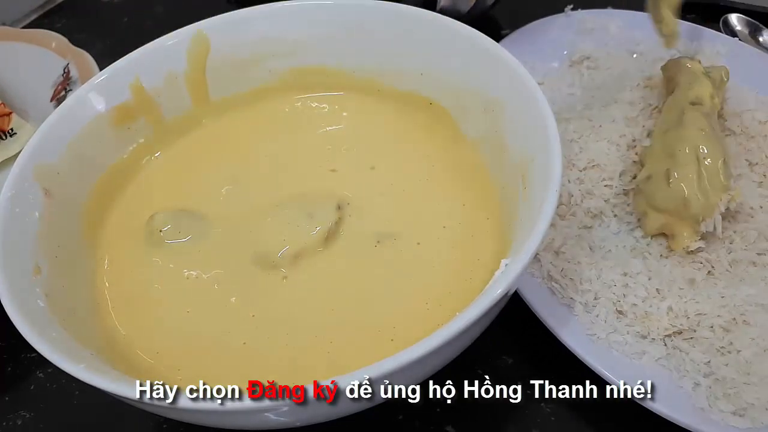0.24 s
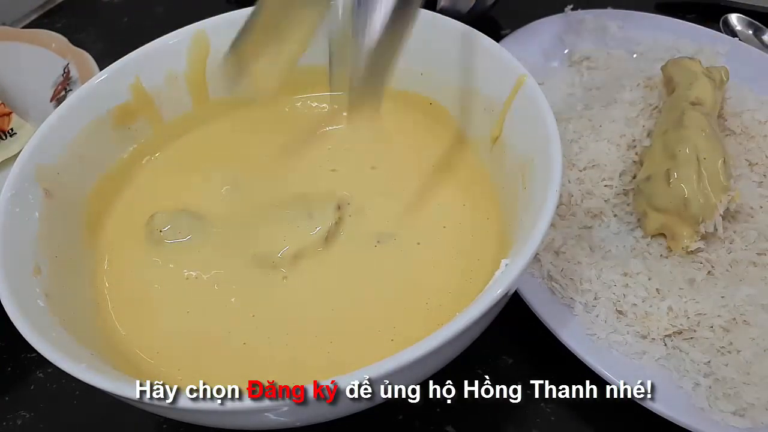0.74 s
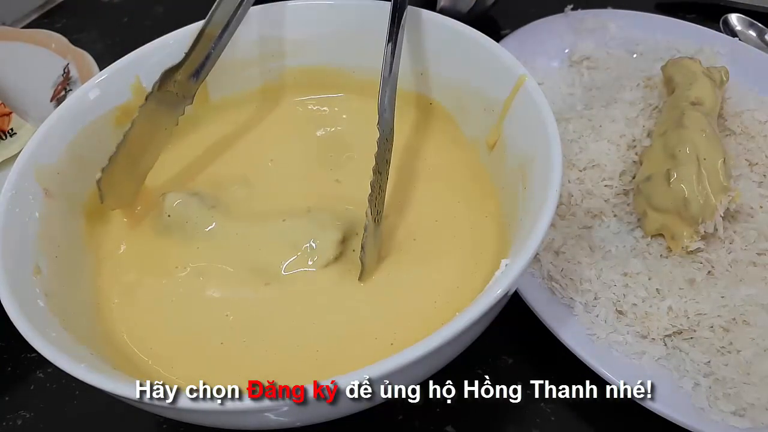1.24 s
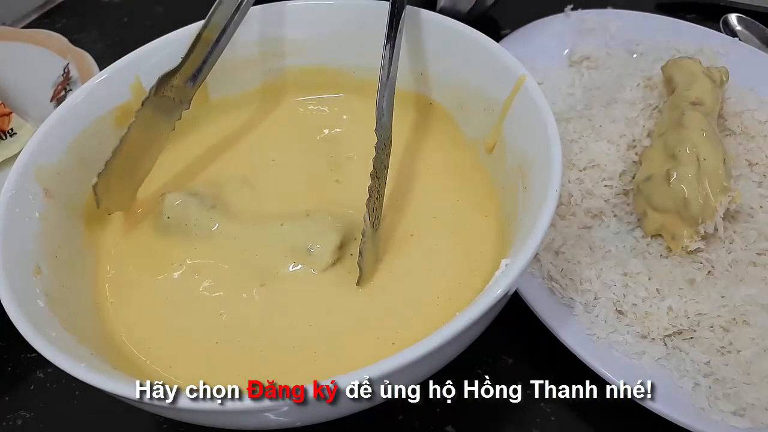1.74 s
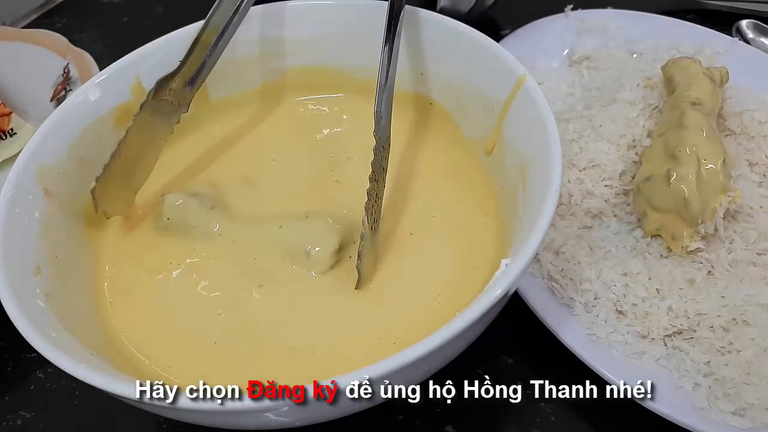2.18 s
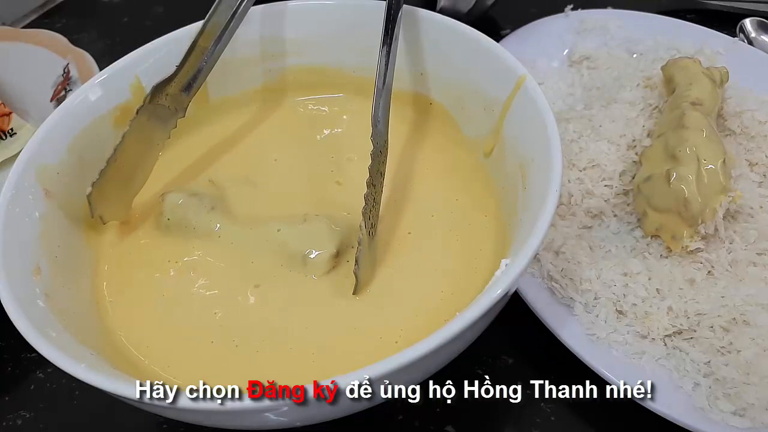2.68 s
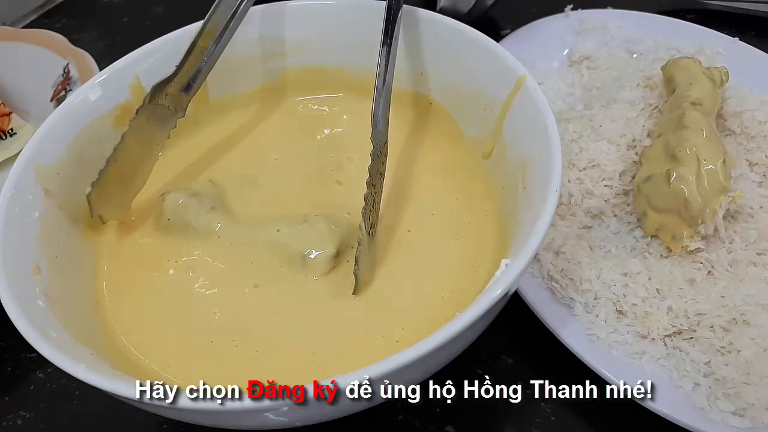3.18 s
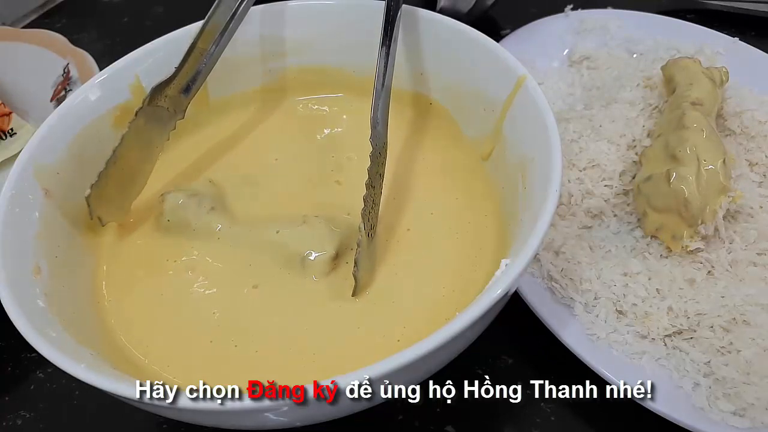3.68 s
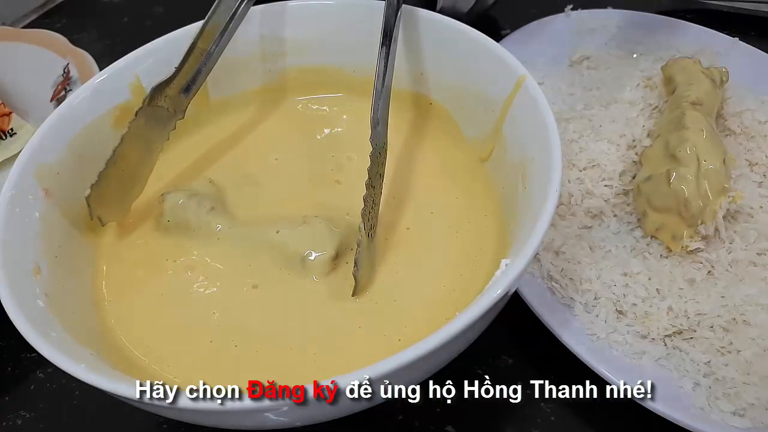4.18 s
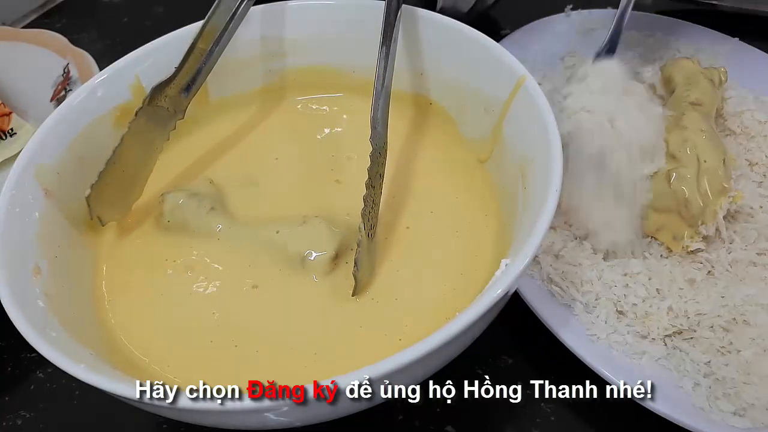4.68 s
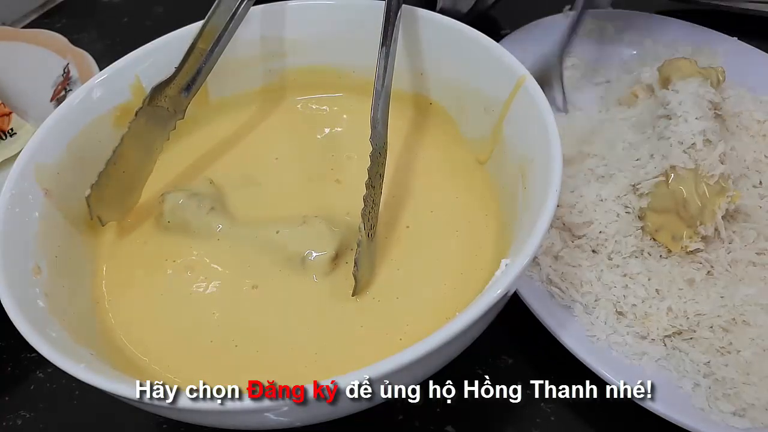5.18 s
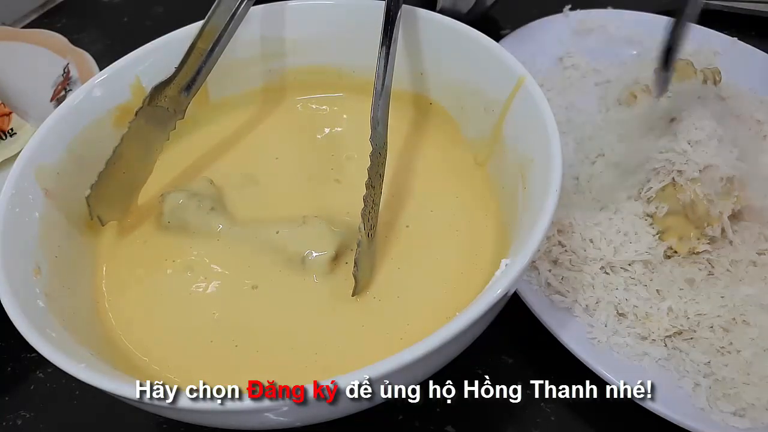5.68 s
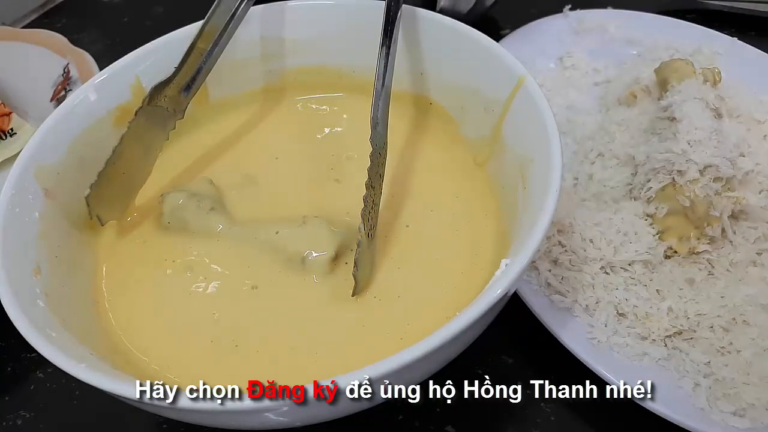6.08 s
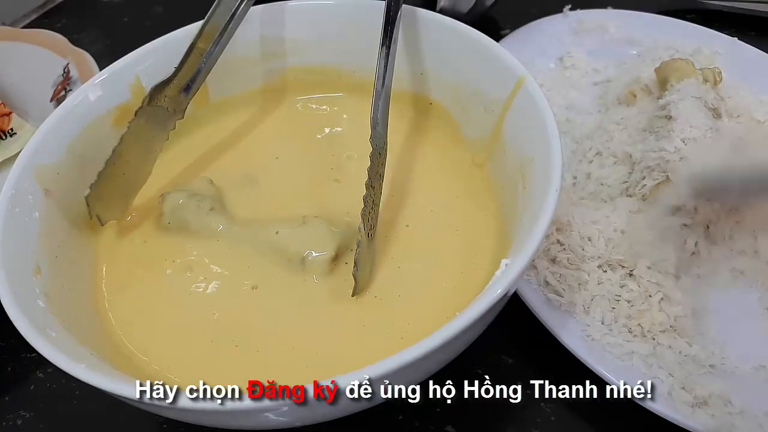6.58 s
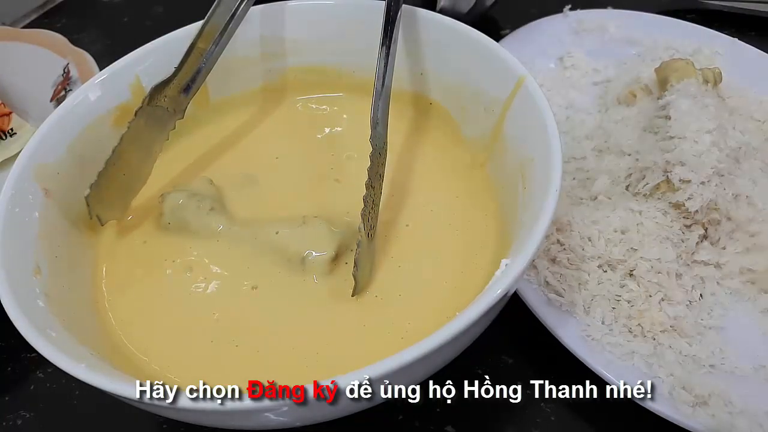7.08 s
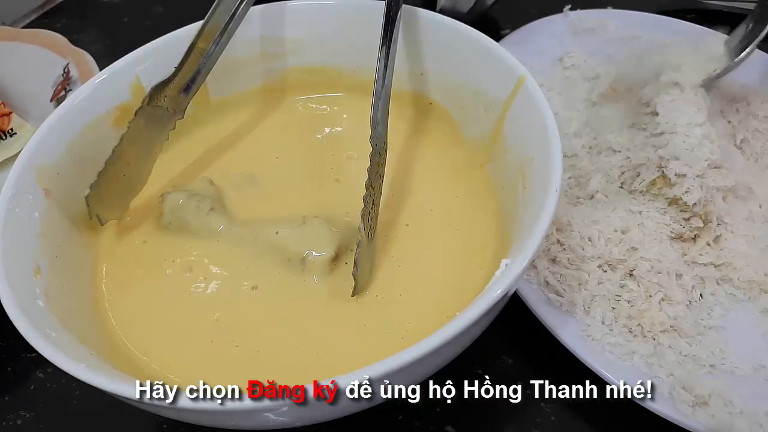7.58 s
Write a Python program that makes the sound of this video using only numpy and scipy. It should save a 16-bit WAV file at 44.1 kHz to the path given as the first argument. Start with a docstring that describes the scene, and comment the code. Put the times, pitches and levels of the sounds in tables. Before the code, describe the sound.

A close stereo kitchen scene sits over a low wavering appliance hum and soft steady air noise, with short reflections from hard walls. At first dry crumbs rustle faintly with tiny crisp snaps, mainly at 0.4 to 0.5 and 0.9 seconds. At about 1.1 and 1.25 seconds tongs strike a ceramic bowl, giving strong hollow clunks with short rings; lighter, drier knocks come at 2.1 and 2.3. From 3.0 to 3.3 a spoon scrapes the plate in loud gritty jerks, with bright steel ringing and clustered clatter. A brief rough squeak of the sliding plate follows around 3.55, a knock at 3.8 and a sharp, hard tap at 4.4. Between 4.8 and 6.6 crumbly strokes come and go with crackling snaps and weak taps. A last dull, short knock lands at 7.0, then sparse quiet rustling, and a soft stroke from 7.65 is still sounding at the end, near 7.8.

```python
"""A kitchen counter, heard close up in stereo, with a low appliance hum and steady air noise throughout.
First dry crumbs rustle and snap as a spoon pushes them about; at 1.1 s tongs start to knock a ceramic bowl.
From about 3 s the spoon scrapes a plate in jerks and rings; at 3.5 s the sliding plate squeaks.
Then come more strokes and scattered knocks, the last at 7 s; a last soft stroke is still sounding at the end.
Shaped noise makes the rough sounds, dying sines the thuds and rings; hard walls answer, loud peaks flatten."""
import sys
import numpy as np
from scipy import signal
from scipy.fft import rfft, irfft, next_fast_len
from scipy.io import wavfile
from scipy.ndimage import map_coordinates

SR = 44100
rng = np.random.default_rng(int(sys.argv[2]) if len(sys.argv) > 2 else 0)


def unload_audio(sound):
    """Save the sound as a 16-bit wav file, at the path given as the first command line argument."""
    columns = np.transpose(np.atleast_2d(sound))
    # keep every value between -1 and 1, then stretch to whole-number steps
    steps = np.round(np.clip(columns, -1, 1) * 32767)
    wavfile.write(sys.argv[1], SR, steps.astype(np.int16))


N = 345744
TOP_HZ = 15983  # nothing above this is kept

# Knocks on dishes: tongs on the bowl, the spoon's jerks as it scrapes, taps on the plate; columns:
# t/s, level/dB, dull thud f/Hz, hard thud f/Hz, hard thud level/dB, share of the full ring time
KNOCKS = [(1.076, 1.5, 907, 1057, -7.5, 0.48), (1.089, -6.5, 857, 1150, -30, 0.82),
          (1.241, 3, 885, 1117, -11, 0.75), (1.253, 2, 935, 1676, -8, 0.68),
          (2.105, -12, 814, 1410, -3, 0.36), (2.126, -3, 790, 1500, -7.5, 0.34),
          (2.321, -1.5, 810, 1490, -3, 0.39), (3.002, -10, 570, 1490, 4, 0.28),
          (3.008, -13.5, 595, 2300, 6.5, 0.29), (3.014, -7.5, 614, 1700, -0.5, 0.23),
          (3.03, -6.5, 1500, 2900, -10, 0.22), (3.058, -7.5, 510, 2520, 8.5, 0.18),
          (3.094, -9.5, 1860, 3520, -2, 0.17), (3.127, -15, 2410, 3970, -6, 0.15),
          (3.201, -1.5, 2600, 4200, -6, 0.22), (3.217, -2.5, 496, 2310, 0, 0.23),
          (3.774, -2.5, 760, 1500, -13, 0.32), (3.782, -5.5, 820, 1520, 0, 0.46),
          (4.4157, 1, 2190, 4010, -3.5, 0.18), (4.417, -10.5, 1013, 2550, -7, 0.48),
          (4.512, -19, 970, 2400, 0, 0.27), (4.574, -19, 397, 740, -6.5, 0.6),
          (5.148, -13.5, 700, 1500, -6.5, 0.41), (5.157, -18, 1110, 1130, -26, 0.81),
          (5.282, -13, 940, 1450, -2.5, 0.23), (6.371, -19.5, 774, 1730, -9.5, 0.61),
          (7.024, -15.5, 414, 3000, -2.5, 0.28), (7.035, -5.5, 780, 1630, -8, 0.14)]
# Tone colour of moving crumbs; columns: f/Hz, level/dB (per Hz)
CRUMB_COLOUR = [(1500, -43), (3500, 3), (5000, 3.5), (8000, 4.5), (12000, 1.5), (16000, -1.5)]


def amp(db):
    """Turn decibels into a factor on the waveform."""
    return 10 ** (np.asarray(db) / 20)


def unit(x):
    """Scale a sound to an average (rms) strength of 1."""
    return x / np.sqrt(np.mean(x ** 2) + 1e-20)


def along(points, hz):
    """Read a curve of (f/Hz, value) points, joined by straight lines on a log frequency axis."""
    f, values = np.transpose(points)
    return np.interp(np.log(hz + 1), np.log(f + 1), values)


def curves(rows, outside=None):
    """Draw one curve over time for each column after the time; outside is its value beyond the ends."""
    s, *columns = np.transpose(rows)
    t = np.arange(N) / SR
    return [np.interp(t, s, column, outside, outside) for column in columns]


def wobble(rate):
    """Draw a smooth random curve through rate random points a second."""
    points = rng.standard_normal(int(N * rate / SR) + 4)
    return map_coordinates(points, [np.arange(N) * rate / SR])


def filtered(x, response):
    """Change the strength and phase of each frequency in x by a response."""
    n = x.shape[-1]
    padded = next_fast_len(n + 8192)  # room for ringing after the end
    spectrum = rfft(x, padded) * response(np.fft.rfftfreq(padded, 1 / SR))
    return irfft(spectrum, padded)[..., :n]


def resonant(peaks):
    """Make the response of a body with resonances (f/Hz, width/Hz, level/dB), added with alternate signs."""
    def response(f):
        total = 0
        for k, (centre, width, db) in enumerate(peaks):
            peak = 1j * f * width / (centre * centre - f * f + 1j * f * width)
            total = total + (-1) ** k * amp(db) * peak
        return total
    return response


def paired(pair):
    """Mix two unrelated signals so that left and right are alike in the bass and differ in the treble."""
    # How alike the two microphones hear; columns: f/Hz, likeness (1 = the same)
    likeness = [(30, 0.99), (150, 0.74), (500, 0.9), (2000, 0.094), (12000, 0.043)]

    def mid_side(hz):
        turn = np.arccos(np.clip(along(likeness, hz), -1, 1)) / 2
        return np.array([np.cos(turn), np.sin(turn)])

    mid, side = filtered(pair, mid_side)
    return np.array([mid + side, mid - side])


def grit(spiky_db, clump_db, clumps):
    """Make rough noise from many small fractures and a few big ones, in random clumps (points a second)."""
    size = np.minimum(rng.exponential(size=N // 32 + 1), 4.5)
    burst = np.repeat(size, 32)[:N]  # a new size every 32 samples
    level_db = spiky_db * burst + clump_db * wobble(clumps)
    return paired(rng.standard_normal((2, N)) * amp(level_db))


def placed(out, s, sound, pan_db):
    """Add a sound at time s; a positive pan makes it louder on the left."""
    start = round(s * SR)
    out = out.copy()
    out[:, start:start + sound.shape[-1]] += sound * amp([[pan_db / 2], [-pan_db / 2]])
    return out


def walls(x, level_db):
    """Add the room's answer: fading noise in which each frequency dies at its own speed."""
    # How long the room's answer takes to fall by 60 dB; columns: f/Hz, time/s
    fade_times = [(200, 0.53), (1000, 0.55), (4000, 0.37), (14000, 0.1)]
    hz, t, z = signal.stft(rng.standard_normal((2, SR // 2)), SR, nperseg=256)
    fading = z * amp(-60 * t / along(fade_times, hz)[:, None])
    tail = signal.istft(fading, SR, nperseg=256)[1]
    tail = np.pad(tail / np.linalg.norm(tail[0]), ((0, 0), (200, 0)))  # starts 200 samples late
    n = x.shape[-1]
    wet = signal.fftconvolve(np.broadcast_to(x, (2, n)), tail, axes=1)[:, :n]
    return x + amp(level_db) * wet


def kitchen():
    """Make unsteady air noise and an appliance hum of sine tones that waver in level and phase."""
    # Colour of the air noise; columns: f/Hz, level/dB (per Hz)
    air_colour = [(12, -64), (20, -10.5), (162, 1), (326, -5.5), (432, -32), (496, -36.5), (571, -15.5),
                  (1080, -17), (1320, -18.5), (2310, -15), (4630, -28.5), (5960, -25.5), (13400, -23),
                  (15800, -30)]
    # Tones of the hum, before a common lift; columns: f/Hz, level/dB
    hum_tones = [(96.9, -61.5), (156.1, -53), (199.2, -57.5), (317.6, -57.5), (371.4, -65)]
    air = unit(filtered(paired(rng.standard_normal((2, N))), lambda hz: amp(along(air_colour, hz))))
    t = np.arange(N) / SR
    hum = 0
    for hz, db in hum_tones:
        level = amp(db + 2.5 + 5.0 * wobble(7.6))
        hum = hum + level * np.sin(2 * np.pi * hz * t + 0.62 * wobble(7.6))
    return amp(-46.0 + wobble(3.26)) * air + hum


def stirring():
    """Work out levels in dB of rustle, plate, rub and dull rub: settling crumbs plus every spoon stroke."""
    # Strokes of the spoon through the crumbs; columns:
    # start t/s, length/s, rustle level/dB, plate level over the rustle/dB
    strokes = [(0.391, 0.017, -36.5, -8.5), (0.483, 0.029, -36, -5), (0.924, .25, -34.5, -9),
               (1.24, 0.029, -26.5, -4), (1.443, 0.12, -46.5, 6), (1.626, .16, -32, -3.5),
               (1.869, 0.17, -34, -4), (2.146, 0.086, -36.5, 4), (2.554, 0.03, -28.5, -5),
               (2.801, 0.18, -29.5, -3), (2.847, 0.018, -25, 3.5), (2.977, .02, -26, 6),
               (2.994, 0.24, -26, 5), (3.449, 0.24, -29.5, 1.5), (3.564, 0.21, -30, 4),
               (3.764, 0.13, -33, -4), (3.913, 0.16, -30, -3), (4.162, 0.064, -39, -1.5),
               (4.302, 0.27, -34, -2.5), (4.84, 0.034, -35, -10.5), (5.139, .1, -34.5, -4),
               (5.278, 0.024, -27.5, -2), (5.6, 0.11, -42.5, -10), (5.754, 0.28, -33.5, -3),
               (6.174, 0.079, -32.5, -5), (6.305, .1, -39.5, -1), (6.522, 0.021, -41, -8),
               (7.004, .15, -45, -29), (7.349, 0.046, -44, -1.5), (7.655, 0.39, -41.5, -5.5)]
    # Between strokes; columns: t/s, settling crumbs level/dB, dull rub of the plate level/dB
    settling = [(0, -49, -51.5), (.85, -55, -56.5), (1.2, -47, -47), (2.8, -44, -47), (3.1, -28.5, -41.5),
                (4.4, -38, -55.5), (4.95, -50.5, -56), (6.1, -39, -52), (6.38, -41, -51), (6.5, -44, -44),
                (6.78, -48, -48), (6.9, -42, -55.5), (7.84, -50, -57.5)]
    settling_plate_db = -5.5  # plate over the settling crumbs
    rub_db = -4.5  # counter under the plate, over the plate
    attack_s, attack_share, fade_db_per_s = 0.0074, 0.16, 198  # long strokes rise more slowly

    t = np.arange(N) / SR
    settle_db, dull_db = curves(settling)
    # amp(2 * dB) gives power, so that separate sounds can be summed
    rustle = amp(2 * settle_db)
    plate = amp(2 * (settle_db + settling_plate_db))
    pressed = np.zeros(N)
    for s, length, db, plate_db in strokes:
        rise = np.clip((t - s) / (attack_s + attack_share * length) + .5, 0, 1) ** 2
        fade_db = fade_db_per_s * np.maximum(t - s - length, 0)
        power = rise * amp(2 * (db - fade_db))
        rustle = rustle + power
        pressed = pressed + power * amp(2 * plate_db)
    rub = pressed * amp(2 * rub_db) + 1e-12
    return 10 * np.log10([rustle, plate + pressed, rub, amp(2 * dull_db)])


def crumbs():
    """Make crumbs crackle as they move, shake the plate's resonances and rub it on the counter."""
    # Resonances of the plate; columns: f/Hz, width/Hz, level/dB
    plate_peaks = [(1680, 490, 1), (2330, 390, 5), (2900, 360, 4.5), (4290, 990, -1)]
    # Resonances of the counter under the plate; columns: f/Hz, width/Hz, level/dB
    counter_peaks = [(326, 79, 5.5), (506, 153, 6), (843, 740, 3.5)]
    rustle_db, plate_db, rub_db, dull_db = stirring()

    def rub_colour(hz):
        return resonant(counter_peaks)(hz) * hz / (hz + 400)  # less bass

    def dull_colour(hz):
        return resonant(counter_peaks[:2])(hz) / (1 + (hz / 750) ** 4)  # less treble

    crackle = grit(spiky_db=3.5, clump_db=2.2, clumps=45)
    rustle = unit(filtered(crackle, lambda hz: amp(along(CRUMB_COLOUR, hz))))
    plate = unit(filtered(grit(spiky_db=4, clump_db=3.0, clumps=43), resonant(plate_peaks)))
    rub = unit(filtered(grit(spiky_db=2.5, clump_db=3.5, clumps=21), rub_colour))
    dull = unit(filtered(grit(spiky_db=1.5, clump_db=4, clumps=20), dull_colour))
    dry = amp(dull_db) * dull
    dry = dry + amp(rustle_db) * rustle * amp([[-1.2], [1.2]])  # a little to the right
    dry = dry + amp(plate_db) * plate + amp(rub_db) * rub
    return walls(dry, level_db=-11)


def squeak():
    """Make the plate stick and slip: a rough band round a drifting pitch, a weaker one half as high again."""
    # Squeak of the sliding plate, before a common lift; columns: t/s, level/dB, pitch f/Hz
    slide = [(3.48, -43, 1655), (3.548, -24, 1660), (3.566, -24, 1650), (3.588, -20, 1607),
             (3.648, -25.5, 1674), (3.662, -41, 1770), (3.7, -35, 1800)]
    level_db = curves(slide, outside=-120)[0]
    turns = np.cumsum(curves(slide)[1]) / SR

    def shake(rate):
        return np.array([wobble(rate), wobble(rate)])

    low = shake(450) * np.sin(2 * np.pi * turns)
    high = shake(600) * np.sin(2 * np.pi * 1.55 * turns)
    return amp(level_db + 5.0) * paired(low + amp(-9.5) * high)


def snaps():
    """Make each crumb snap or steel tick a burst of a few milliseconds, then uneven, dying fragments."""
    # The clearest snaps of crumbs and ticks of steel, before a common cut; columns: t/s, level/dB, f/Hz
    clear_snaps = [(0.2758, -20.5, 8300), (0.398, -26, 2900), (0.485, -16, 10400), (0.6122, -21.5, 3380),
                   (0.845, -21.5, 8310), (1.1967, -14, 3270), (1.308, -11.5, 2830), (1.4535, -20, 2860),
                   (1.5199, -15, 8750), (1.639, -17, 4200), (1.895, -12.5, 11800), (1.9692, -14, 3800),
                   (2.0434, -14, 4440), (2.154, -31, 2500), (2.1862, -15, 3250), (2.522, -17, 8400),
                   (2.5705, -16, 3190), (2.5856, -4, 8800), (2.7373, -9, 12300), (3.0597, 5, 12500),
                   (3.0924, 6, 11570), (3.1267, 0, 11300), (3.1484, 4, 12700), (3.7738, 0.5, 3500),
                   (3.8368, -10.5, 2840), (3.915, -8, 8260), (3.9814, -13, 4250), (4.1525, -13, 11540),
                   (4.3964, -16, 7570), (4.4159, -5, 4100), (4.4313, -25, 2560), (4.6652, -10.5, 11800),
                   (4.7258, -16.5, 6230), (4.8498, -11.5, 5640), (5.0797, -17.5, 8950), (5.424, -14, 6450),
                   (5.5169, -14, 7600), (5.7668, -12.5, 8660), (5.7855, -5, 3920), (5.8586, -4, 4200),
                   (5.911, -12, 4450), (5.9303, -17, 4070), (5.9683, -10, 12100), (5.993, -11, 12100),
                   (6.028, -19, 4300), (6.0992, -8.5, 5450), (6.1706, -10, 8200), (6.32, -15, 6030),
                   (6.536, -19.5, 2720), (6.5592, -19.5, 6500), (7.3871, -17, 8260), (7.752, -14, 6170)]
    tick_db, tick_hz, tick_lag_s = -10.5, 2870, .002  # steel on the glaze at every knock
    small_per_s, small_db, small_hz = 22, 10.5, 4500  # lesser snaps: rate, level over the rustle, usual centre
    pan_usual_db, pan_scatter_db = -3, 3  # left over right

    out = np.zeros((N + SR, 2))
    t = np.arange(SR // 8) / SR
    burst = t / .0009 * np.exp(1 - t / .0009)  # strongest after 0.9 ms

    # lesser snaps fall at random and follow the rustle's level
    count = round(small_per_s * N / SR)
    when = rng.random(count) * N / SR
    size_db = rng.uniform(-6, 2, count)
    pitch = rng.normal(0, .45, count)
    levels_db = stirring()[0][(when * SR).astype(int)] + small_db + size_db
    small = list(zip(when, levels_db, np.minimum(small_hz * np.exp(pitch), TOP_HZ)))
    ticks = [(s + tick_lag_s, db + tick_db, tick_hz) for s, db, *_ in KNOCKS]

    for s, db, centre_hz in clear_snaps + ticks + small:
        pan_db = rng.normal(pan_usual_db, pan_scatter_db)
        uneven = np.repeat(rng.exponential(size=len(t) // 64 + 1), 64)[:len(t)]
        fall = burst + amp(-9 - 60 * t / .025) * uneven
        noise = fall * rng.standard_normal(len(t))
        click = filtered(noise, resonant([(centre_hz, centre_hz, 0)]))
        click = click / (4 * np.sqrt(np.mean(click[:256] ** 2)))  # even out the random strength
        both_db = db - 2.0 + np.array([pan_db, -pan_db]) / 2
        out[round(s * SR):][:len(t)] += click[:, None] * amp(both_db)
    return walls(out[:N].T, level_db=-7.5)


def spoon():
    """Make rough sliding ring the thin steel at its own pitches and grind the plate, over an uneven rumble."""
    # The spoon dragged hard over the plate, before fixed trims; columns: t/s, steel ring level/dB, grinding level/dB
    scrape = [(3.04, -28, -24), (3.052, -53, -29), (3.06, -17.5, -10), (3.082, -12, -19.5),
              (3.102, -9.5, -12), (3.194, -11.5, -8.5), (3.32, -38, -56)]
    # Resonances of the spoon; columns: f/Hz, width/Hz, level/dB
    steel_peaks = [(6040, 38, -12), (7440, 60, -5), (7800, 39, -9), (8670, 38, -11), (9860, 35, -9),
                   (10700, 120, -14), (11400, 32, -3), (11700, 33, 0), (12600, 38, -3), (13800, 38, -12),
                   (14600, 47, -3)]
    # Resonances of the plate under the spoon; columns: f/Hz, width/Hz, level/dB
    ground_peaks = [(350, 210, -7.5), (980, 380, -7.5), (1740, 300, 1.5), (2500, 470, 1), (4100, 990, -5)]
    rumble_hz, rumble_db = 34.8, -23.5  # a low, uneven rumble under the scrape; level over the grinding curve

    ring_db, grind_db = curves(scrape, outside=-120)
    ring = unit(filtered(grit(spiky_db=4.0, clump_db=3.5, clumps=75), resonant(steel_peaks)))
    scratch = grit(spiky_db=5.0, clump_db=1.5, clumps=130)
    hiss = unit(filtered(scratch, lambda hz: amp(along(CRUMB_COLOUR, hz))))
    grind = unit(filtered(grit(spiky_db=4, clump_db=5, clumps=70), resonant(ground_peaks)))
    clumpy_noise = grit(spiky_db=0, clump_db=6, clumps=20).mean(0)  # the same on both sides
    rumble = unit(filtered(clumpy_noise, resonant([(rumble_hz, 2 * rumble_hz, 0)])))
    steel = amp(ring_db) * (amp(2) * ring + amp(-3.5) * hiss)
    dry = steel + amp(grind_db + 2.0) * grind
    return amp(grind_db + rumble_db) * rumble + walls(dry, level_db=-6.5)


def knocked_dishes():
    """Make each knock two short thuds and a rattle, with one set of ceramic tones ringing more or less."""
    # Ringing tones of the ceramic; columns: f/Hz, level/dB, time to fall by 60 dB/s (cut to 0.6 s below)
    dish_tones = [(355, -10, 0.44), (495, -16, 0.61), (824, -7, 0.6), (894, -2, 0.33), (1066, -8, 0.33),
                  (1152, -9, 0.31), (1270, -19, 0.75), (1610, 0, 0.11), (1701, -12, 0.45),
                  (1766, -16, 0.84), (2159, -15, 0.3), (2266, -9, 0.45)]
    ring_level_db, ring_grows = -11, 1.25  # a damped ring is fainter too
    pan_db = 0.9  # left over right

    out = np.zeros((2, N + SR))
    t = np.arange(SR // 2) / SR
    rise = 1 - np.exp(-t / .0007)

    def struck(hz, t60):
        return amp(-60 * t / t60) * np.sin(2 * np.pi * hz * t)

    for s, db, dull_hz, hard_hz, hard_db, share in KNOCKS:
        ring = 0
        for hz, level_db, t60 in dish_tones:
            scattered_db = level_db + rng.normal(0, 3.5)
            ring = ring + amp(scattered_db) * struck(hz, share * min(t60, .6))
        dull_thud = amp(-1) * struck(dull_hz, .055 * share)
        hard_thud = amp(hard_db + 6) * struck(hard_hz, .04 * share)
        colour = resonant([(dull_hz, 0.94 * dull_hz, 0), (hard_hz, 0.99 * hard_hz, hard_db)])
        dying_noise = amp(-2.0 - 60 * t / (0.28 * share)) * rng.standard_normal(len(t))
        rattle = filtered(dying_noise, colour)
        counter = amp(-22) * struck(221, 0.1)  # the worktop answers low
        ring = amp(ring_level_db) * share ** ring_grows * ring
        knock = rise * (ring + dull_thud + hard_thud + rattle + counter)
        out = placed(out, s, walls(amp(db) * knock, level_db=-10), pan_db)
    # the dishes are too small to send out bass
    return filtered(out[:, :N], lambda hz: (1j * hz / (130 + 1j * hz)) ** 2)


def scene():
    """Add all the sources; crumbs, squeak and snaps are farther from the left microphone."""
    lag = 14  # samples later on the left
    left, right = crumbs() + squeak() + snaps()
    late_left = np.pad(left, (lag, 0))[:N]
    return kitchen() + spoon() + knocked_dishes() + np.array([late_left, right])


def record(dry):
    """Tilt the treble from left to right, flatten peaks near full scale and cut all above the top frequency."""
    tilt_db = np.array([[-1.5], [1.5]])  # left, right at 12 kHz
    dry = filtered(dry, lambda hz: amp(tilt_db * (hz / 12000) ** 2))
    hard = 8  # a higher number bends more sharply into the limit
    clipped = dry / (1 + np.abs(dry) ** hard) ** (1 / hard)
    return filtered(clipped, lambda hz: hz < TOP_HZ)


dry = scene()
out = record(dry)
unload_audio(out)
```